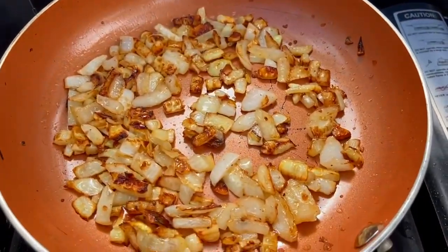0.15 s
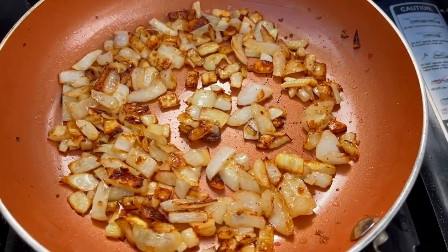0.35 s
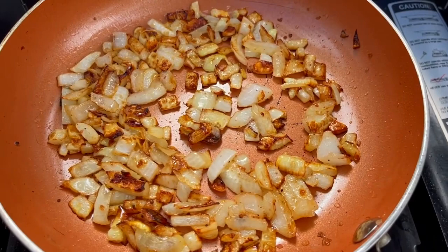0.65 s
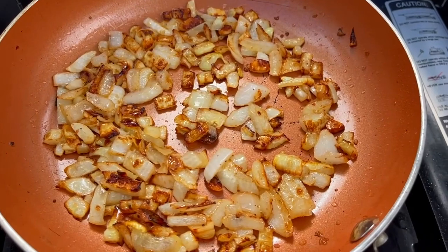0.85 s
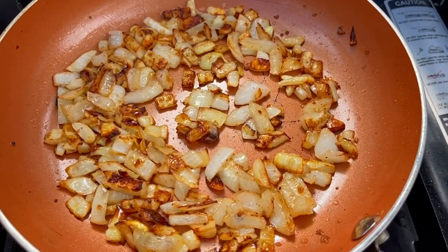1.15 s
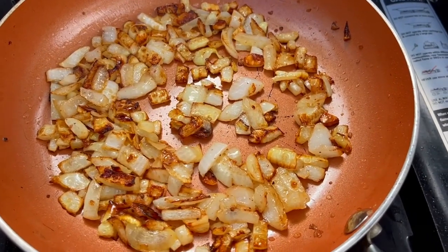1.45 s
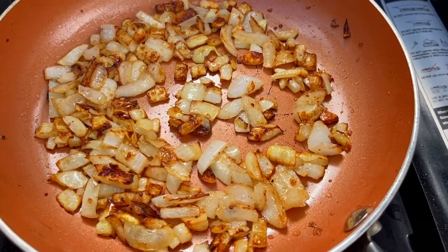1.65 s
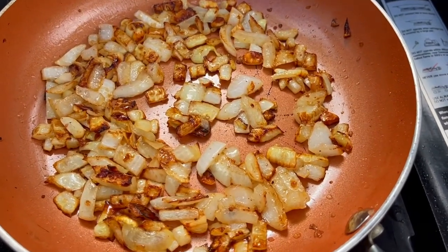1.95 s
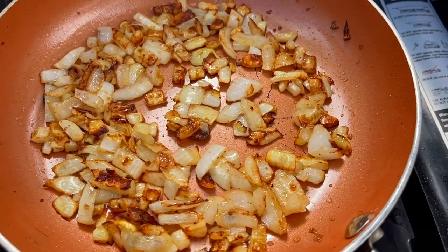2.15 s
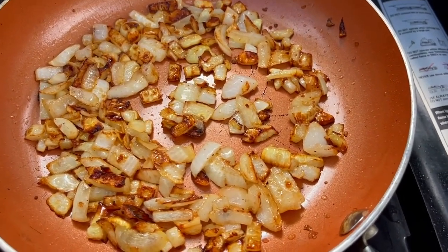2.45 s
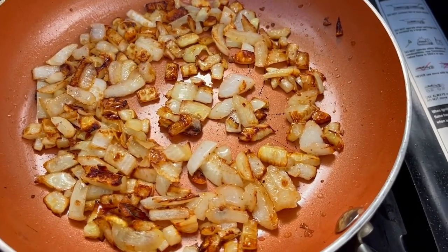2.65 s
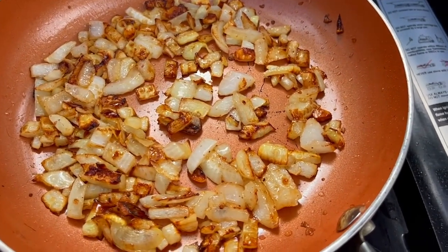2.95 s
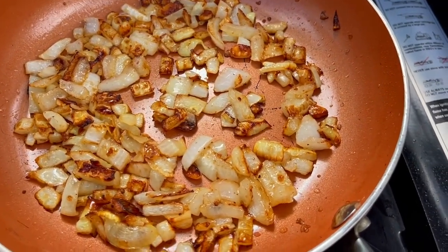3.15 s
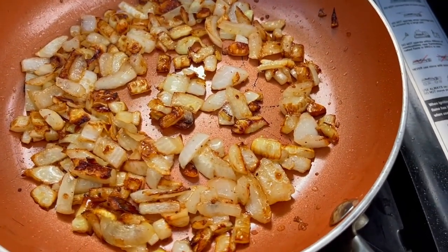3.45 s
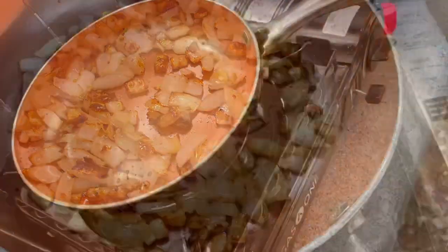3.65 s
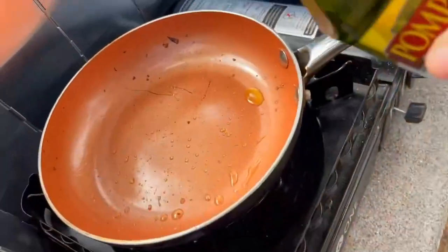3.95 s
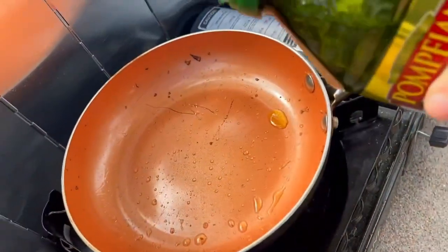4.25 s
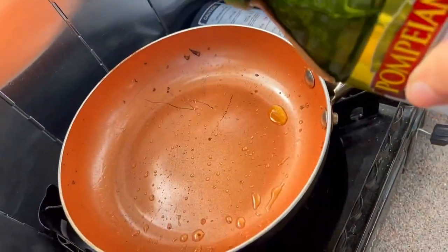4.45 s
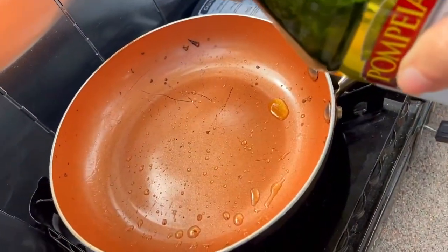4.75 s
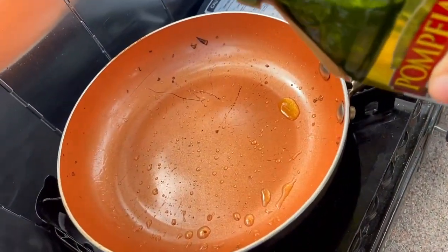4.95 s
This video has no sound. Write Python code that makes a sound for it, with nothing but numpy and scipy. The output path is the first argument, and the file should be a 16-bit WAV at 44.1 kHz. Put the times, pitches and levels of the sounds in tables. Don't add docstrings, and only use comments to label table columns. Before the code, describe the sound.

Onions sizzle hard in a pan on a camp stove, close to the microphones, oil droplets snapping irregularly, some almost overloading. The frying drops away within a fraction of a second. Much quieter, an empty pan sits over a hissing, whistling gas jet while a plastic oil bottle is bumped and squeezed, its wall crackling. Distant engines hum softly beneath.

```python
import sys
import numpy as np
from scipy import signal
from scipy.fft import rfft, irfft, next_fast_len
from scipy.io import wavfile

SR = 44100
rng = np.random.default_rng(int(sys.argv[2]) if len(sys.argv) > 2 else 0)


def dump_mix(stems):
    frames = np.atleast_2d(stems).T
    limited = np.clip(frames, -1, 1)
    pcm = np.round(limited * 32767).astype(np.int16)
    wavfile.write(sys.argv[1], SR, pcm)


def elevation(decibels):
    levels = np.asarray(decibels, float)
    return 10 ** (levels / 20)


N = 225615


def rms_one(x):
    return x / np.sqrt(np.mean(x ** 2) + 1e-20)


def peak_one(x):
    return x / np.abs(x).max()


def level_in_time(rows):
    s, db = np.transpose(rows)
    return np.interp(np.arange(N) / SR, s, db, left=-140, right=-140)


def drift(rate_hz):
    r = np.exp(-2 * np.pi * rate_hz / (SR / 10))
    noise = rng.standard_normal(N // 10 + 4002)
    slow = signal.lfilter([1], [1, -2 * r, r * r], noise)[4000:]
    return np.interp(np.arange(N) / 10, np.arange(len(slow)), rms_one(slow))


def colour(x, spectrum):
    size = next_fast_len(x.shape[-1] + 512)
    hz = np.arange(1, size // 2 + 2) * SR / size
    at, db = np.transpose(spectrum)
    octaves_below = np.log2(np.maximum(at[0] / hz, 1))
    octaves_above = np.log2(np.maximum(hz / at[-1], 1))
    gain_db = np.interp(np.log(hz), np.log(at), db) - 18 * octaves_below - 400 * octaves_above
    return irfft(rfft(x, size) * elevation(gain_db), size)[..., :x.shape[-1]]


def resonance(x, hz, width):
    r = np.exp(-np.pi * width / SR)
    poles = [1, -2 * r * np.cos(2 * np.pi * hz / SR), r * r]
    return signal.lfilter([(1 - r * r) / 2, 0, (r * r - 1) / 2], poles, x)


def grains(per_s, uneven_db):
    sizes = elevation(uneven_db * np.minimum(rng.exponential(1, (2, N)), 5)) * rng.choice([-1, 1], (2, N))
    return sizes * (rng.random((2, N)) < per_s / SR)


def panned(twins, left_minus_right_db):
    return twins[[0, 0, 1]] * elevation(left_minus_right_db / 2 * np.array([[1], [-1], [-1]]))


def ports(x, table):
    size = next_fast_len(N + 4096)
    hz = np.arange(size // 2 + 1) * SR / size
    at, *columns = np.transpose(table)
    lead, alike, right_db = [np.interp(hz, at, c) for c in columns]
    alike = np.clip(alike, 0, 1)
    left, shared, other = rfft(x, size)
    right = alike * np.exp(-1j * lead) * shared + np.sqrt(1 - alike ** 2) * other
    return irfft(np.array([left * elevation(-right_db / 2), right * elevation(right_db / 2)]), size)[:, :N]


# middle in seconds, length in seconds, level in dB, pitch in Hz.
ENGINES = [
    (.6, .3, -57, 151.8),
    (1.62, .85, -51, 151.5),
    (2.35, 0.3, -55, 151),
    (3.05, 0.33, -55.5, 151.6),
    (3.9, .3, -55.5, 162),
    (4.65, 0.69, -53.5, 161),
]


def passing_engines():
    t = np.arange(N) / SR
    waver_cycles = np.cumsum(0.796 * drift(2.7)) / SR
    tones = 0
    for middle, length, db, hz in ENGINES:
        swell = np.exp(-(2 * (t - middle) / length) ** 4)
        tones = tones + elevation(db) * swell * np.sin(2 * np.pi * (hz * t + waver_cycles))
    return np.sqrt(2) * elevation(1.5 * drift(5)) * tones


# frequency in Hz, density in dB per Hz.
RUMBLE_SPECTRUM = [(22, -24), (31, -18), (40, -11.5), (50, -3), (64, 0.5), (80, 0), (100, -5), (125, -8.5),
                   (200, -13.5), (310, -17.5), (420, -24.5)]


def traffic(side_db):
    rumble_db = -44 + 1.07 * drift(2.5)
    mid, side = rms_one(colour(rng.standard_normal((2, N)), RUMBLE_SPECTRUM))
    return elevation(rumble_db) * (mid + elevation(side_db) * side * [[1], [-1]]) + passing_engines()


# frequency in Hz, density in dB per Hz.
JET_SPECTRUM = [(710, -48), (1200, -21), (2410, -14.5), (2800, -22), (3110, -8), (3560, -21.5), (4100, -6),
                (4600, -13), (5010, -8), (5780, -6), (6930, -8), (7990, -24), (8960, -8), (11700, -13),
                (15200, -53), (22000, -120)]
# pitch in Hz, width in Hz, level in dB relative to the hiss.
JET_WHISTLES = [(3127, 110, -16), (4270, 110, -15), (4820, 40, -17), (4990, 47, -8.5), (5280, 31, -13),
                (5470, 27, -11.5), (9000, 68, -9), (9300, 89, -4.5)]


def jet():
    start_s, full_s, full_db, rise_db_per_s = 3.5, 3.8, -51.5, 0.5
    noise = rng.standard_normal((2, N))
    hiss = rms_one(colour(rng.standard_normal((2, N)), JET_SPECTRUM))
    for hz, width, db in JET_WHISTLES:
        whistle = resonance(resonance(noise, hz, width), hz, width)
        hiss = hiss + elevation(db + 1.4 * drift(9.1)) * rms_one(whistle)
    t = np.arange(N) / SR
    swell = np.clip((t - start_s) / (full_s - start_s), 0, 1) ** 2
    return panned(swell * elevation(full_db + rise_db_per_s * (t - full_s)) * hiss, -0.1)


# time in seconds, level in dB.
RUSTLE_LEVEL = [(3.76, -53), (3.84, -48), (4.012, -51.5), (4.118, -46), (4.28, -54), (4.64, -57.5),
                (4.7, -50.5), (4.9, -57), (5.116, -55)]


def rustle():
    slips = rms_one(grains(per_s=1800, uneven_db=3.5)) + 0.7 * rng.standard_normal((2, N))
    slips = slips * elevation(1.5 * drift(35))
    wall = resonance(slips, 487, 160) - resonance(slips, 770, 240)
    wall = wall + resonance(slips, 1055, 180) - 0.4 * resonance(slips, 2030, 990)
    wall = signal.sosfilt(signal.butter(2, 420, "high", fs=SR, output="sos"), wall)
    return panned(elevation(level_in_time(RUSTLE_LEVEL) + 0.5) * rms_one(wall), 0.44)


# start in seconds, peak level in dB, pitch in Hz, crack between 1.5 and 4.8
# kHz in dB relative to the peak.
BOTTLE_KNOCKS = [(3.788, -28.5, 620, -12), (3.795, -26.5, 1540, -10), (3.808, -20.5, 1350, -14),
                 (3.8137, -11, 595, -22), (3.818, -22, 1410, -19), (3.826, -26, 1340, -20),
                 (3.829, -17, 630, -24), (3.845, -29, 910, -18), (3.854, -29, 1170, -8),
                 (3.894, -31, 1080, -16), (3.916, -40, 721, -2), (3.928, -32, 1300, -3),
                 (3.953, -36.5, 926, 4), (4.021, -34.5, 1210, -1), (4.088, -36, 750, 1),
                 (4.139, -34.5, 1990, -12), (4.174, -45, 713, 10), (4.192, -40, 1130, 4),
                 (4.211, -40, 700, 6), (4.261, -26.5, 955, -2), (4.267, -35, 950, -8),
                 (4.684, -31, 1090, -13), (4.708, -29.5, 1040, -14), (4.751, -38, 1070, -8),
                 (4.77, -41, 1100, -8), (4.81, -42, 1300, -10), (4.866, -41, 1110, -9)]


def bottle():
    out, t = np.zeros((3, N + 4096)), np.arange(4096) / SR
    crack_band = signal.butter(2, [1500, 4800], "band", fs=SR, output="sos")
    tick_band = signal.butter(3, [6000, 11600], "band", fs=SR, output="sos")
    pans_db = 6.5 + 1.5 * rng.standard_normal(len(BOTTLE_KNOCKS))
    noises = rng.standard_normal((len(BOTTLE_KNOCKS), 2, 4096))
    for (s, db, hz, crack_db), pan_db, noise in zip(BOTTLE_KNOCKS, pans_db, noises):
        t60 = 0.039 + 0.0008 * (db + 31)
        push = noise * (1 - np.exp(-t / 0.0011)) * elevation(-60 * t / t60)
        snap = np.exp(-((t - 0.001) * 8 * hz) ** 2)
        snapped = push[[0, 0]] + snap
        hollow = resonance(resonance(snapped, hz, 0.33 * hz), hz, hz)
        hollow = hollow - 0.32 * resonance(snapped, 2.2 * hz, 0.6 * hz)
        crack = signal.sosfilt(crack_band, push * elevation(-60 * t / 0.022))
        tick = signal.sosfilt(tick_band, push * elevation(-60 * t / 0.047))
        blow = peak_one(hollow) + elevation(crack_db + 3.5) * peak_one(crack) + elevation(-8) * peak_one(tick)
        i = round(s * SR)
        out[:, i:i + 4096] += panned(elevation(db - 2.5) * blow, pan_db)
    thump_s, thump_db, thump_hz, thump_t60 = 3.808, -24.5, 190, 0.12
    weight = rng.standard_normal(4096) * (1 - np.exp(-t / 0.004)) * elevation(-60 * t / thump_t60)
    thump = resonance(weight, thump_hz, 0.9 * thump_hz)
    i = round(thump_s * SR)
    out[:, i:i + 4096] += elevation(thump_db) * peak_one(thump)
    return out[:, :N]


# frequency in Hz, width in Hz, level in dB.
PAN_MODES = [(544, 175, -0.5), (782, 264, -0.5), (1190, 225, 1.5), (1809, 95, 5), (2530, 240, -4)]


def flame(level_db):
    noise = rng.standard_normal((2, N)) * elevation(0.9 * drift(34))
    roar = 0
    for k, (hz, width, db) in enumerate(PAN_MODES):
        roar = roar + elevation(db) * (-1) ** k * resonance(noise, hz, width)
    roar = signal.sosfilt(signal.butter(4, 470, "high", fs=SR, output="sos"), roar)
    return panned(elevation(level_db - 1.0) * rms_one(roar), 0)


# frequency in Hz, density in dB per Hz.
FIZZ_SPECTRUM = [(900, -30.5), (2000, -20.5), (3500, -15.5), (5000, -14), (6300, -13), (7500, -9.5),
                 (8600, -5.5), (10000, -4.5), (11200, 0.5), (11900, -2.5), (12800, -9), (13800, -16),
                 (14800, -19), (15750, -17.5)]


def fizz(level_db, per_s, uneven_db, clump_db, smooth_db):
    clumps = elevation(clump_db * (drift(150) + 0.45 * drift(30) + 0.25 * drift(7)))
    bursts = rms_one(grains(per_s, uneven_db) * clumps)
    bursts = bursts + elevation(smooth_db) * rng.standard_normal((2, N))
    return panned(elevation(level_db + 3.5) * rms_one(colour(bursts, FIZZ_SPECTRUM)), 0)


USUAL_FIZZ_DB = -29
# time in seconds, fizz level in dB.
FRYING_LEVEL = [(0.0, -28.5), (0.3, -29), (0.75, -28.5), (1.31, -29), (1.62, -28.5), (1.85, -29.5),
                (2.08, -28.5), (2.25, -29.5), (2.5, -27.5), (2.68, -29), (3.35, -29.5), (3.46, -29),
                (3.6, -34), (3.7, -39.5), (3.76, -49.5), (3.82, -55)]
# start in seconds, peak level in dB, body below 6 kHz in dB relative to the peak,
# length in milliseconds, pitch in Hz.
BIG_DROPLETS = [(0.099, -6.5, -18, 1.8, 10600), (0.3407, -2.5, -25, 1.24, 10700),
                (0.4304, -6, -25, 1.3, 9600), (0.4343, -10, -18, 1.7, 9600), (0.672, -1.5, -45, .8, 10200),
                (0.7125, 3.5, -10, 1.4, 10400), (0.7759, -1.5, -25, 1.9, 9600),
                (0.9135, -5.5, -20, 1.1, 9600), (1.0246, -1.5, -9, 0.98, 10300),
                (1.229, -6, -31, 1.6, 10800), (1.5957, -6, -21, 5.5, 8100), (1.6051, -5, -22, 1.1, 9300),
                (1.632, -4, -21, 6.9, 9300), (2.0527, -3.5, -20, 1.5, 8800), (2.1806, -6.5, -37, 2.5, 9900),
                (2.4221, -1.5, -22, .82, 10900), (2.4382, -6, -17, 1.7, 10400),
                (2.459, -2.5, -18, 1.7, 10300), (2.7159, -2, -49, 1.7, 9900), (2.801, 2, -20, 1.3, 10500),
                (3.2041, -4, -22, 1.1, 10000), (3.2438, -7.5, -35, 1.8, 9900),
                (3.5458, -19, -0.5, 3.3, 9900), (3.5567, -9.5, -34, 1.4, 11500)]
# start in seconds, peak level in dB, body in dB relative to the peak.
MIDDLING_DROPLETS = [(0.1417, -11, -20), (0.2653, -9, -16), (0.2772, -10, -34), (0.2837, -9, -28),
                     (0.2907, -10.5, -32), (0.4837, -13, -22), (0.6921, -11.5, -33), (0.8026, -12, -31),
                     (0.858, -14, -10), (0.9552, -8.5, -25), (0.9744, -6, -33), (1.0378, -14, -14),
                     (1.344, -11, -27), (1.6009, -12, -20), (1.6725, -12, -17), (2.0622, -8, -25),
                     (2.0944, -10, -15), (2.1271, -11, -14), (2.3127, -8, -42), (2.4681, -8, -22),
                     (2.5215, -10.5, -27), (2.7447, -10, -38), (2.8054, -7, -33), (3.157, -9, -27),
                     (3.2248, -12, -34), (3.2316, -10, -33), (3.2906, -13, -17), (3.467, -11, -35),
                     (3.5724, -15, -31), (3.726, -25, -27)]


def droplets():
    specks = 40
    s = 3.7 * rng.random(specks)
    fading_db = np.minimum(np.interp(s, *np.transpose(FRYING_LEVEL)) - USUAL_FIZZ_DB, 0)
    peak_db = -15.5 + 1.5 * rng.standard_normal(specks) + fading_db
    body_db = -26 + 5 * rng.standard_normal(specks)
    drops = list(BIG_DROPLETS)
    for row in list(MIDDLING_DROPLETS) + list(zip(s, peak_db, body_db)):
        length_ms = 1.57 * elevation(2.0 * rng.standard_normal())
        pitch_hz = 10400 * (1 + 0.03 * rng.standard_normal())
        drops.append((*row, length_ms, pitch_hz))
    return drops


# frequency in Hz, width in Hz, level in dB.
DROPLET_RING = [(800, 700, -9.5), (1800, 460, -0.5), (4700, 900, -8)]


def pops():
    out = np.zeros((3, N + 1024))
    ms = np.maximum(np.arange(1024) - 64, 0) * 1000 / SR
    body_band = signal.butter(1, [1500, 6500], "band", fs=SR, output="sos")
    drops = droplets()
    pans_db = -0.3 + 1.5 * rng.standard_normal(len(drops))
    noises = rng.standard_normal((len(drops), 2, 1024))
    for (s, db, body_db, length_ms, hz), pan_db, clicks in zip(drops, pans_db, noises):
        phase = ms / (0.28 * length_ms)
        ring_on = 0.07 * (ms > 0) * np.exp(-ms / 7.1)
        spray = clicks * (phase ** 0.75 * np.exp(-phase) + ring_on)
        top = peak_one(colour(0.35 * spray + resonance(spray, hz, 3800), FIZZ_SPECTRUM))
        body = peak_one(signal.sosfilt(body_band, spray))
        for ring_hz, width, ring_db in DROPLET_RING:
            body = body
        body = signal.sosfilt(body_band, spray)
        for ring_hz, width, ring_db in DROPLET_RING:
            body = body + elevation(ring_db + 4) * resonance(spray, ring_hz, width)
        burst = elevation(db + 2.5) * (top + elevation(body_db - 2.0) * peak_one(body))
        i = max(round(s * SR) - 70, 0)
        out[:, i:i + 1024] += panned(burst, pan_db)
    return out[:, :N]


# frequency in Hz, lead of the left in radians,
# likeness from 0 to 1, right over left in dB.
PORTS_FULL_PAN = [(0, 3, .9, 0), (350, 0.6, 0.84, 3.5), (870, -1, 0.66, 1), (1300, -0.6, 0.82, 2),
                  (2900, -0.2, 0.38, 2), (4300, -0.2, 0.36, 0.5), (5960, -1.3, 0.7, 4),
                  (6750, 1.34, 0.88, -1), (7700, -2, 0.2, 4), (9040, 0, 0.94, -0.3), (10700, 3, 1, 0.5),
                  (12540, 7, 0.89, 0), (14100, 9, 1, -1), (14800, 10, 0.8, -3), (15800, 13.5, 0.7, 0),
                  (16300, 14.5, .95, 4)]
# frequency in Hz, lead of the left in radians,
# likeness from 0 to 1, right over left in dB.
PORTS_EMPTY_PAN = [(0, 1.5, 0.5, -3), (700, 0.5, 0.57, 2), (1280, .5, 0.7, 0), (2120, 0.6, 0.98, 2),
                   (5000, 0.73, 0.94, 0.5), (6450, 1.9, 0.4, 0), (9100, -1.83, 0.93, -0.5),
                   (13100, -2.5, 1, 2)]


def scene():
    fizz_db = level_in_time(FRYING_LEVEL)
    flame_db = -42.5 + 0.74 * (fizz_db - USUAL_FIZZ_DB)
    full_pan = fizz(fizz_db, per_s=6000, uneven_db=1.6, clump_db=2.5, smooth_db=-1.0)
    full_pan = full_pan + flame(flame_db) + pops()
    empty_pan = jet() + rustle() + bottle()
    near = ports(full_pan, PORTS_FULL_PAN) + ports(empty_pan, PORTS_EMPTY_PAN)
    return near + traffic(side_db=-15.0)


def low_pass(x):
    return signal.sosfilt(signal.butter(12, 16710, fs=SR, output="sos"), x)


def record(dry):
    mix = np.clip(dry, -1, 1)
    return low_pass(mix)


dry = scene()
out = record(dry)
dump_mix(out)
```